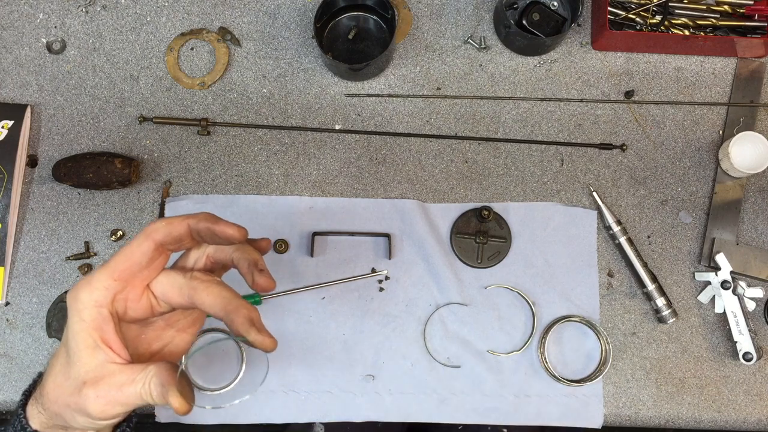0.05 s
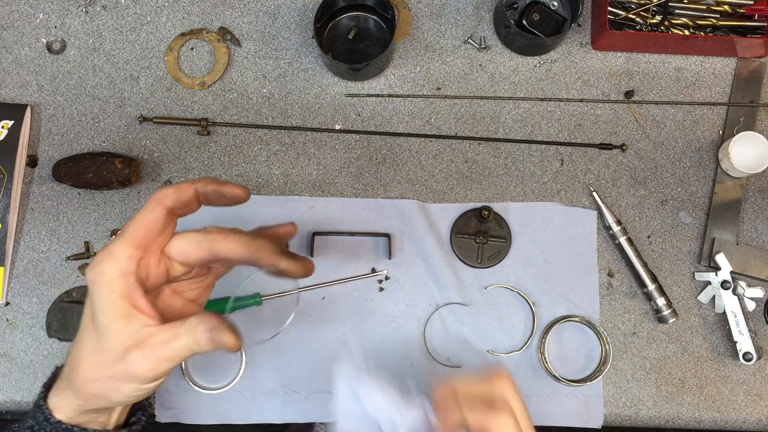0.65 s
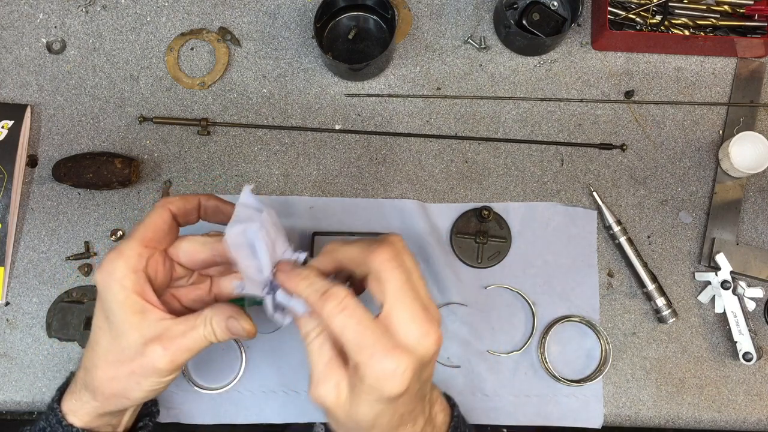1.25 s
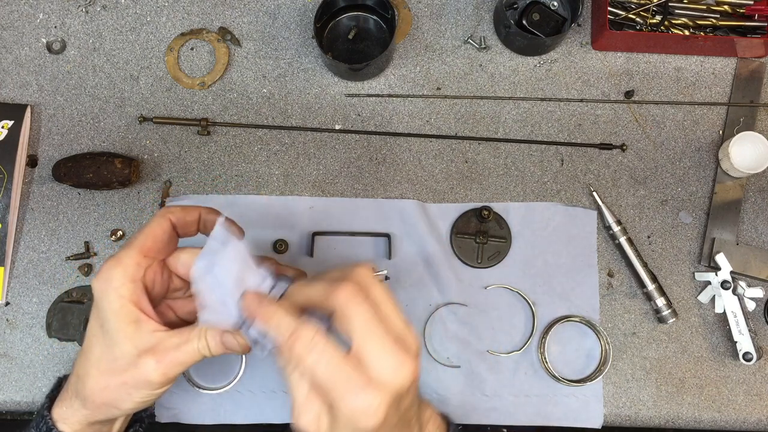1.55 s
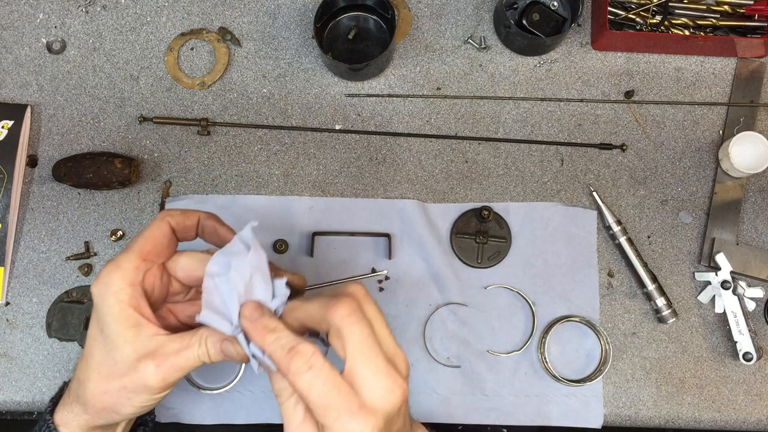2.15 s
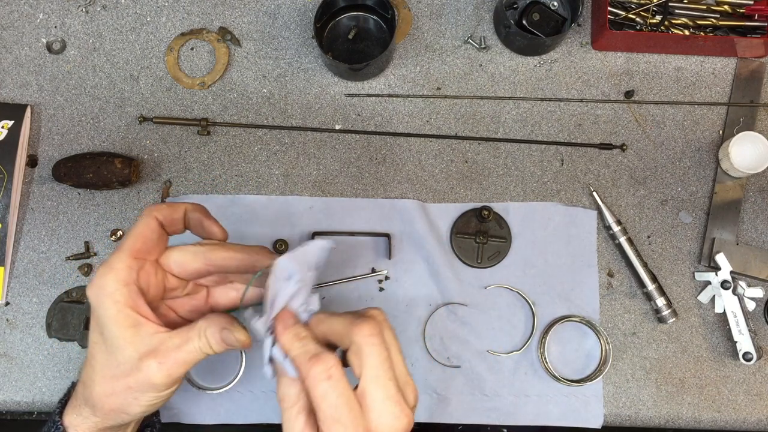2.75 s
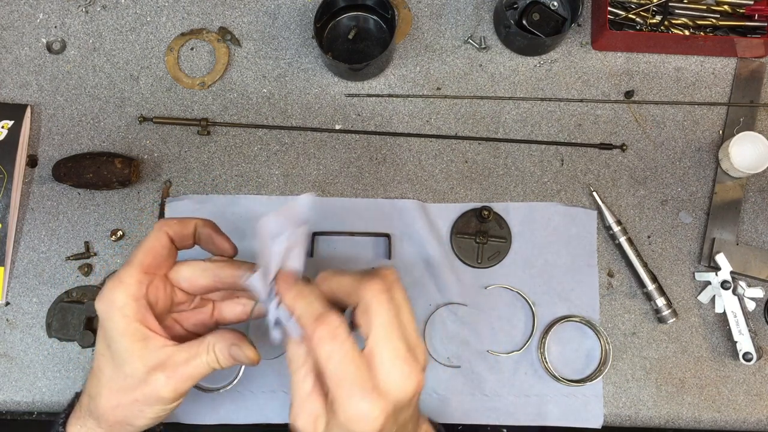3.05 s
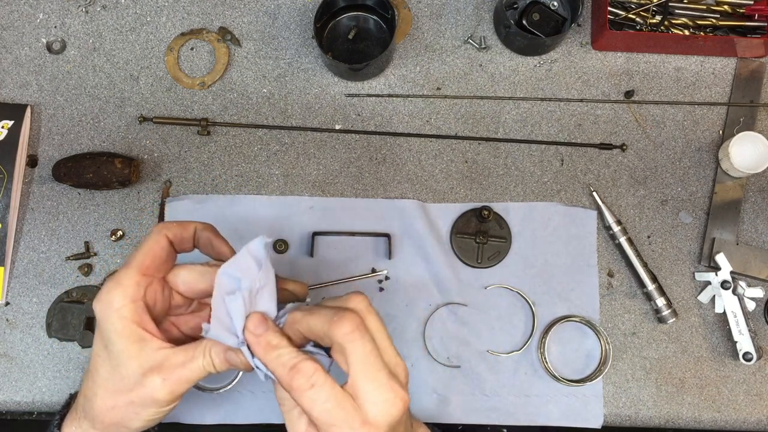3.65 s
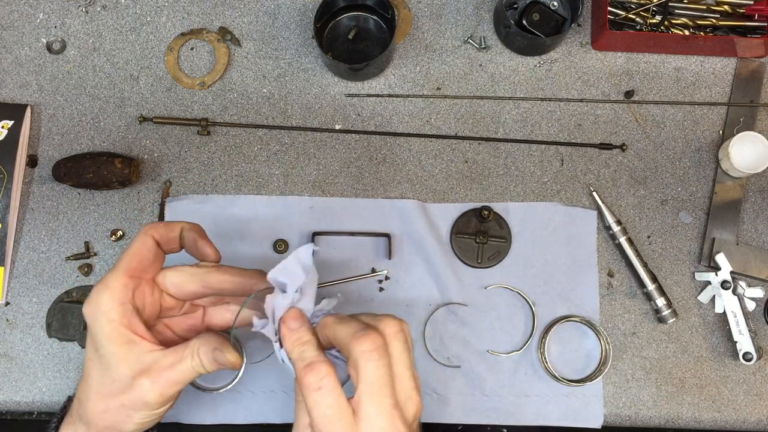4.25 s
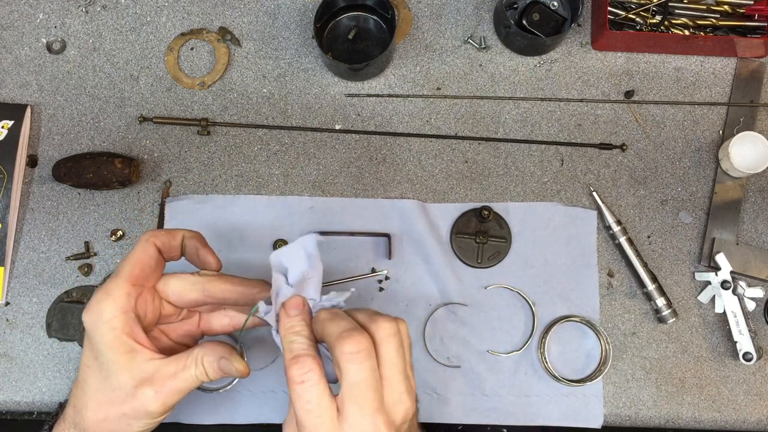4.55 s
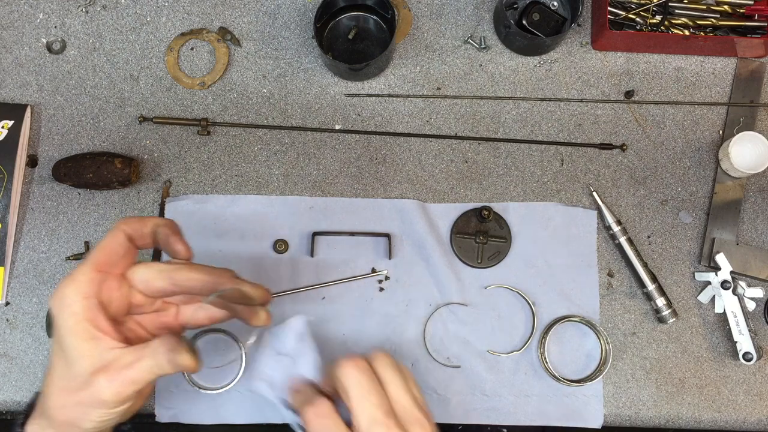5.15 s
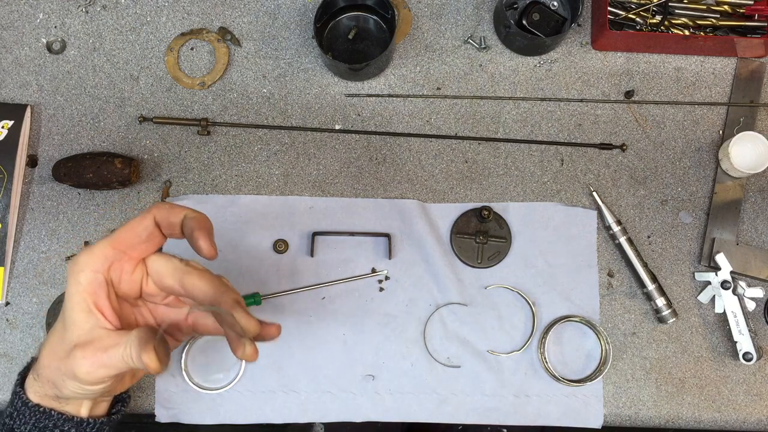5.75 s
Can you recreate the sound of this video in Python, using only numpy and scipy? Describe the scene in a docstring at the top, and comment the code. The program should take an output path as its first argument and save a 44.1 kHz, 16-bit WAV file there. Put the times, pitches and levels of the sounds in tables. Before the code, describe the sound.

In the first second a sleeve swishes over a workbench, with a couple of dry finger ticks and a few dull bumps around 0.2 seconds. From about 1 second a cloth polishes a small round glass in quick back-and-forth strokes, a soft hiss with some scraping. The glass sticks and slips in very short gliding squeaks that jump between a reedy low register and a thin high one. The squeaks come thickly until 2.5 seconds, ease off, and return from about 3.1 seconds. Near 4 seconds the glass judders once, briefly. Softer rubbing follows, with a few more squeaks around 4.8 to 5.1 seconds. By 5.4 seconds the strokes have ended and the cloth fades out in a dull rustle. Everything is close, with the slight echo of a small garage, still air and a faint electrical hum.

```python
"""A cloth polishes a small round glass held in the fingers, close up, over a workbench.
First the hand shifts, the sleeve swishes and the bench takes a few dead bumps. From 1 s quick strokes
hiss to and fro, and the glass sticks and slips in short gliding squeaks that jump between a low and a
high register. Near 4 s it judders once; by 5.4 s the strokes have ended and the cloth rustles out.
Throughout, a small garage answers faintly over still air and mains hum."""
import sys
import numpy as np
from scipy import signal
from scipy.fft import rfft, irfft, next_fast_len
from scipy.io import wavfile
from scipy.ndimage import uniform_filter1d, map_coordinates

SR = 44100
rng = np.random.default_rng(int(sys.argv[2]) if len(sys.argv) > 2 else 0)


def unload_audio(sound):
    """Save the sound as a 16-bit wav file, at the path given as the first command line argument."""
    columns = np.transpose(np.atleast_2d(sound))
    # keep every value between -1 and 1, then stretch to whole-number steps
    steps = np.round(np.clip(columns, -1, 1) * 32767)
    wavfile.write(sys.argv[1], SR, steps.astype(np.int16))


N = 255559
TIME = np.arange(N) / SR
BAND_LIMIT_HZ = 15850


def amp(db):
    """Decibels to gain."""
    return 10 ** (np.asarray(db) / 20)


def unit_rms(x):
    """Scales to rms 1."""
    return x / np.sqrt(np.mean(x ** 2) + 1e-20)


def at_hz(curve, hz):
    """Interpolates a table on a log-frequency axis."""
    points_hz, values = np.transpose(curve)
    return np.interp(np.log(hz + 1), np.log(points_hz + 1), values)


def colour(x, spectrum):
    """Filters x by a spectrum, at rms 1."""
    size = next_fast_len(len(x) + 512)
    gain = amp(at_hz(spectrum, np.fft.rfftfreq(size, 1 / SR)))
    return unit_rms(irfft(rfft(x, size) * gain, size)[:len(x)])


def wander(count, rate_hz):
    """Smooth random curve with a spread of about 1."""
    position = np.arange(count) * rate_hz / SR
    return map_coordinates(rng.standard_normal(int(position[-1]) + 4), [position + 1], order=2)


def add(mix, start_s, sound):
    """Mixes a sound in at a time."""
    part = mix[max(0, round(start_s * SR)):][:len(sound)]
    part += sound[:len(part)]


# Resonances that shape rasp and overtones. Each row: frequency in Hz, relative level in dB.
SLIP_SPECTRUM = [(40, -48), (250, -34), (480, -2), (800, 3.5), (1200, 2.5), (1700, 5.5), (2400, -3.5),
                 (3200, -11.5), (4200, -10.5), (5300, -12), (7000, -14), (10000, -29), (15000, -32)]

def stick_slip(length_s, mid_hz, glide_oct, level_db, swell_db, overtone_db, rasp_db, edge_s=0.0023):
    """The glass sticks and slips at a gliding rate; each slip also sheds a puff of noise."""
    count = int((length_s + edge_s / 2) * SR)
    progress = np.linspace(0, 1, count)
    roughness = amp(min(rasp_db, 0) / 2)
    arch_oct = 2.2 * length_s + 0.2 * abs(glide_oct)  # long or wide glides arch more
    first_hz = mid_hz * 2 ** (-glide_oct / 2 - arch_oct)
    last_hz = mid_hz * 2 ** (glide_oct / 2 - arch_oct)
    hz = np.polyval(np.polyfit([0, 0.5, 1], [first_hz, mid_hz, last_hz], 2), progress)
    cycles = np.cumsum(hz * (1 + 0.045 * roughness * wander(count, 700))) / SR
    tone = np.sin(2 * np.pi * cycles)
    for k, lag in enumerate(rng.random(size=8), 2):
        body_db = at_hz(SLIP_SPECTRUM, k * hz) - at_hz(SLIP_SPECTRUM, 2 * mid_hz) - 10 * np.log2(k / 2)
        smear = 0.097 * (k - 2 + roughness) * wander(count, 916)  # no two slips are alike
        overtone = np.sin(2 * np.pi * (k * cycles + lag + smear))
        tone += amp(overtone_db + body_db) * overtone * (k * hz < BAND_LIMIT_HZ)
    # Big slow slips rasp most; fast ones come unevenly strong and fray the tone.
    lowness = 1 / (1 + (mid_hz / 2200) ** 4)
    puffs = colour(rng.standard_normal(count) * np.exp(-(cycles % 1) / 0.2), SLIP_SPECTRUM)
    fray = 1 + 0.88 * roughness ** 2 * (1 - lowness) * wander(count, 1788)
    voice = np.sqrt(2) * tone * fray + amp(rasp_db - 0.5) * lowness * puffs
    grip = unit_rms(amp(swell_db * progress + 1.6 * roughness * wander(count, 341.93)))
    fades = signal.windows.tukey(count, min(1, 2 * edge_s / length_s))
    return amp(level_db) * voice * grip * fades


# Low-register slips. Each row: start in seconds, length in seconds, mid pitch in Hz, glide in octaves,
# then relative level, overtones and rasp in dB.
LOW_SLIPS = [(1.063, 0.026, 739, 1.04, -30.5, -30, -13.5), (1.194, .013, 1503, 0.38, -29.5, -35, -11),
             (1.302, .025, 1262, .8, -40.5, -18, -4.5), (1.349, 0.0065, 1236, -0.34, -33.5, -25, -23),
             (1.396, 0.016933, 670, 0.86, -32.5, -19, -19),
             (1.496, 0.007195, 960, 0.59, -30.5, -8.5, -10.5), (1.523, 0.025, 722, -0.17, -35, -18, -6),
             (1.602, 0.01737, 723.7, 0.13, -34, -17, -3.5), (1.698, 0.014523, 977.7, 0.71, -31, -9, -11.5),
             (1.817, 0.017575, 497, 0.353, -42, -6, -5), (1.908, 0.019, 874, 0.82, -34.5, -7, -15),
             (2.031, .021, 481, 0.46, -42, 1, -11), (2.114, 0.024, 879.6, 0.86, -33, -5.5, -10),
             (2.139, 0.034, 898, -0.14, -28, -9, -7.5), (2.252, .012, 731, 0.38, -40, 0, -1),
             (2.348, .01, 1112, 0.55, -30, -14, -13), (2.478, 0.012, 974, 0.47, -38.5, 2.5, 4.5),
             (3.11, 0.021, 736.4, 0.64, -42.5, -15, 0), (3.134, 0.024, 1200, -0.3119, -38.5, -33, -14),
             (3.207, .01, 740, 0.16, -39, -17, -16), (3.304, 0.019, 1124, 1.2135, -40, -12, -1),
             (3.342, 0.028176, 997.5, -0.3307, -36, -9.5, -8),
             (3.413, 0.019294, 753.8, 0.17, -38, -12, -26), (3.506, 0.037, 740, -.2, -33.5, -4.5, -9.5),
             (3.541, 0.035, 567, 0.37, -32.5, -4.5, -2), (3.572, .041, 907.5, 0.2142, -27, -13.5, -9),
             (3.752, .018, 742.7, -0.1788, -47.5, -9, -26), (3.807, 0.04784, 568.4, -0.61, -47, -11, -8),
             (3.92, 0.011, 1025, -0.36, -36.5, -12, -12), (3.93, 0.0282, 878, 0.22, -34.5, 0.5, -9.5),
             (4.028, 0.03797, 928.9, 0.078, -51, 8.5, -1), (4.067, 0.032, 1472, 0.11, -37, -16.5, -18),
             (4.107, 0.021826, 1530, -0.1956, -37, -20, -22.5),
             (4.127, 0.02643, 1055, -0.2051, -45, 0.5, -8), (4.813, 0.0345, 681, 0.16, -35, -6.5, -14.5),
             (5.018, 0.017, 1953, 0.11, -41.5, -13, -4.5)]

def low_squeaks():
    """The glass breaks loose, reedy; slower slips are bigger, and a rising squeak builds gradually."""
    out = np.zeros(N)
    for start_s, length_s, hz, glide_oct, db, overtone_db, rasp_db in LOW_SLIPS:
        edge_s = 0.002 + 0.18 * max(glide_oct, 0) * length_s
        swell_db = 1 - 6 * glide_oct
        add(out, start_s, stick_slip(length_s, hz, glide_oct, db, swell_db, overtone_db, rasp_db, edge_s))
    return out


# High-register slips. Each row: start in seconds, length in seconds, mid pitch in Hz, glide in octaves,
# then relative level and rasp in dB.
HIGH_SLIPS = [(1.079, 0.012912, 2177, 0.62, -36, 2.5), (1.089, 0.035, 2911, -0.01, -33, -10.5),
              (1.122, 0.034, 2435, 0.06, -37, -2.5), (1.309, 0.021, 4950, 0.6, -43.5, -8),
              (1.497, 0.016, 4240, .02, -48, 0), (1.6, .006, 2430, 0.04, -38.5, -2),
              (1.606, 0.0081, 4800, 0.1, -43.5, -11), (1.727, 0.02266, 5480, -0, -49.5, -7),
              (1.741, 0.01601, 2417, -0.08, -42, 3), (1.811, 0.008137, 2036, 0.47, -33, 0),
              (1.814, 0.021, 4110, 0.39, -40, -5.5), (1.945, 0.017, 5340, -0.1, -43, -41),
              (2.021, 0.02246, 2559, 0.75, -36.5, -1), (2.165, 0.03001, 2400, 0.26, -36, -36),
              (2.254, .02, 2248, 0.7, -36.5, -7), (2.357, 0.0379, 2530, -0.11, -35.5, -17),
              (2.484, 0.00874, 4035, .15, -34, -6), (2.489, 0.011, 2820, .2, -36, -6),
              (3.122, 0.0136, 4010, 0.26, -49, -3), (3.323, .024, 4700, .45, -51, 0),
              (3.412, 0.01338, 4982, 0.35, -37, -16), (3.51, .036, 4950, 0.5, -42.5, -1.5),
              (3.548, 0.0603, 5170, .08, -43.5, -1.5), (3.835, 0.0099, 4020, -.1, -50.5, -2.5),
              (4.846, 0.016, 3073, .06, -35.5, -24.5), (4.862, 0.039, 3336, -0.24, -35.5, -11.5),
              (5.042, .016, 5279, .05, -38.5, -29), (5.052, 0.057, 4520, -0.34, -45.5, -17)]

def whistles(swell_db_per_oct=-16):
    """In mid-stroke the slipping jumps high; it fades as it rises and swells as it falls."""
    out = np.zeros(N)
    for start_s, length_s, hz, glide_oct, db, rasp_db in HIGH_SLIPS:
        overtone_db = -8 + at_hz(SLIP_SPECTRUM, 2 * hz) - at_hz(SLIP_SPECTRUM, hz)
        swell_db = swell_db_per_oct * glide_oct
        add(out, start_s, stick_slip(length_s, hz, glide_oct, db, swell_db, overtone_db, rasp_db))
    return out


# The cloth sticking again. Each row: start in seconds, relative level in dB.
CLOTH_GRABS = [(1.148, -45.5), (1.748, -32), (1.962, -28.5), (2.188, -31.5), (2.389, -34), (2.967, -41),
               (3.037, -40.5), (3.151, -34.5), (3.365, -39), (3.608, -33), (4.892, -31.5)]

def grabs():
    """A few slowing slips end a stroke in a short falling croak."""
    out = np.zeros(N)
    for start_s, db in CLOTH_GRABS:
        croak = stick_slip(length_s=0.00624, mid_hz=742.7, glide_oct=-0.35, level_db=db,
                           swell_db=-12, overtone_db=-1, rasp_db=-2.5)
        add(out, start_s, croak)
    return out


# Modes of the held glass. Each row: frequency in Hz, bandwidth in Hz, relative level in dB.
GLASS_MODES = [(830.1, 110, -5), (1576, 171.5, 3.5), (2140, 190, -8.5), (5300, 380, -8.5)]

def judder(start_s=3.9575, slips=9, first_gap_s=0.0042, slowing=1.178, first_db=-17, step_db=-1.57):
    """Lone slips, ever later and weaker, each ring the finger-damped glass for a few cycles."""
    out, t = np.zeros(N), np.arange(SR // 40) / SR
    attack = 1 - np.exp(-t / 0.0014)
    for k in range(slips):
        ring = np.zeros(len(t))
        for hz, width_hz, db in GLASS_MODES:
            detuned_hz = hz * rng.uniform(0.94, 1.05)
            ring += amp(db) * np.exp(-np.pi * width_hz * t) * np.sin(2 * np.pi * detuned_hz * t)
        add(out, start_s, amp(first_db + k * step_db) * ring * attack)
        start_s += first_gap_s * slowing ** k
    return out


def movement(rows, sharpness):
    """Speed envelope: each move starts from rest, peaks at 42 % of its length and stops again."""
    out = np.zeros(N)
    for start_s, length_s, db in rows:
        t = np.arange(max(0, -start_s), length_s, 1 / SR)
        angle = np.interp(t / length_s, [0, 0.42, 1], [0, np.pi / 2, np.pi])
        add(out, start_s, amp(db) * abs(np.sin(angle)) ** sharpness)
    return out


def fibres(spectrum, grain_db, flutter_db):
    """Countless tiny snags of uneven size, coming in clumps."""
    sizes = np.minimum(rng.exponential(1, N), 3.5)
    snags = rng.standard_normal(N) * amp(grain_db * sizes)
    clumps = amp(flutter_db * wander(N, 260))
    return colour(snags * clumps, spectrum)


# Polishing strokes. Each row: start in seconds, length in seconds, relative level in dB.
CLOTH_STROKES = [(1.044, 0.15, -52), (1.17, 0.12, -53), (1.286, 0.094, -54), (1.375, 0.12, -57.5),
                 (1.477, 0.091, -51), (1.578, 0.11, -57.5), (1.687, 0.097, -49.5), (1.786, 0.10426, -55),
                 (1.897, .105, -51), (1.998, 0.10745, -54), (2.107, .12, -51.5), (2.207, 0.14765, -59),
                 (2.332, 0.11, -58), (2.452, .114, -53), (2.57, 0.18253, -52.5), (2.752, 0.14368, -51.5),
                 (2.911, 0.094, -53), (2.992, 0.08653, -62.5), (3.067, 0.12, -54), (3.188, 0.11, -59),
                 (3.287, 0.11766, -56), (3.387, .1, -58), (3.48, 0.1717, -53.5), (3.685, 0.0625, -70.5),
                 (3.731, 0.10882, -53), (3.919, .1, -53), (4.005, .18, -52.5), (4.16, 0.12, -57),
                 (4.25, 0.087, -58), (4.335, 0.12, -57), (4.45, 0.08204, -70.5), (4.513, 0.056, -61.5),
                 (4.582, 0.068, -54), (4.62, 0.1452, -65), (4.79, 0.13, -53), (4.975, 0.21061, -53.5),
                 (5.151, 0.035, -49), (5.24, 0.084, -61)]
# Finger pressure. Each row: time in seconds, scrape gain in dB.
FINGER_PRESSURE = [(1.1, 4), (1.3, 7.5), (1.6, 6.5), (2.05, 8), (2.28, 14.5), (2.5, 9.5), (2.8, -7.5),
                   (3.05, 8.5), (3.4, 1.5), (3.55, 5), (3.96, 4), (4.09, -13), (4.3, 3), (4.85, -3),
                   (5.17, 1.5), (5.27, 10)]
# Cloth on glass. Each row: frequency in Hz, relative level in dB.
HISS_SPECTRUM = [(1500, -8.5), (3000, -1.5), (4500, -7), (6000, -0.5), (7400, 4.5), (9800, -6), (12500, -1),
                 (15800, -10.5)]
SCRAPE_SPECTRUM = [(150, -43), (350, -6), (700, -0.5), (1100, -1), (1700, 1), (2400, -4.5), (3300, -15.5),
                   (6000, -16), (12000, -50)]

def cloth(creep_db=-21, creep_s=0.18):
    """Hiss and scrape follow the speed of each stroke; at the turns the folds only creep."""
    speed = movement(CLOTH_STROKES, sharpness=1.66)
    creep = amp(creep_db) * uniform_filter1d(speed, int(creep_s * SR))
    pressure_db = np.interp(TIME, *np.transpose(FINGER_PRESSURE))
    hiss = amp(2.5) * fibres(HISS_SPECTRUM, grain_db=2.5, flutter_db=2.5)
    scrape = amp(pressure_db - 0.85) * fibres(SCRAPE_SPECTRUM, grain_db=2.5, flutter_db=3)
    return (speed + creep) * (hiss + scrape)


# Sleeve moves. Each row: start in seconds, length in seconds, relative slide and fizz levels in dB.
SLEEVE_MOVES = [(-.12, 0.38, -43.5, -55), (0.048, 0.07776, -47, -48), (0.201, 0.1, -41, -43),
                (0.264, 0.16, -42, -47.5), (0.419, 0.081, -48, -62), (0.474, 0.14, -41, -40.5),
                (0.543, 0.24, -52.5, -59), (0.686, 0.027, -53, -59.5), (0.713, 0.26, -49, -47),
                (0.93, 0.2, -57, -53.5)]
# Sleeve on bench. Each row: frequency in Hz, relative level in dB.
SLIDE_SPECTRUM = [(25, -20), (60, -5), (200, -8), (500, -8.5), (900, -0.5), (1800, 7), (2800, -2.5),
                  (5000, -7.5), (8000, -14), (15000, -20)]
FIZZ_SPECTRUM = [(1500, -8), (3000, -2.5), (4500, -4.5), (7200, 1.5), (9800, -4), (12500, -5.5),
                 (15800, -17.5)]

def sleeve(sharpness=1.16):
    """Hand and sleeve slide over the bench: a swish with a fine fizz on top."""
    start_s, length_s, slide_db, fizz_db = np.transpose(SLEEVE_MOVES)
    slide_speed = movement(zip(start_s, length_s, slide_db + 0.2), sharpness)
    fizz_speed = movement(zip(start_s, length_s, fizz_db - 6.5), sharpness)
    slide = slide_speed * fibres(SLIDE_SPECTRUM, grain_db=4, flutter_db=2)
    fizz = fizz_speed * fibres(FIZZ_SPECTRUM, grain_db=4.5, flutter_db=3)
    return slide + fizz


# Handling of the cloth. Each row: time in seconds, relative level in dB.
RUSTLE_LEVELS = [(0, -47), (.26, -49.5), (1.08, -57), (1.2, -61), (1.7, -66.5), (2.05, -72.5), (2.29, -49),
                 (2.8, -64), (3.15, -61), (3.75, -69), (4.75, -68.5), (5.2, -59.5), (5.38, -53.5),
                 (5.79, -76)]
# New grips. Each row: start in seconds, length in seconds, relative level in dB.
GRIP_SQUEEZES = [(.19, 0.04412, -49), (1.055, 0.06565, -51), (2.135, 0.067, -49), (3.81, 0.13, -55),
                 (5.152, 0.046, -53.5)]
# Bunched cloth. Each row: frequency in Hz, relative level in dB.
RUSTLE_SPECTRUM = [(30, -14.5), (70, -9), (150, -2.5), (280, -1), (450, -2), (900, -7), (2500, -25.5)]

def rustle():
    """The bunched cloth rustles dully throughout, more when squeezed for a new grip."""
    handling = amp(np.interp(TIME, *np.transpose(RUSTLE_LEVELS)))
    squeezes = movement(GRIP_SQUEEZES, sharpness=1.16)
    return amp(-2.5) * (handling + squeezes) * fibres(RUSTLE_SPECTRUM, grain_db=1.5947, flutter_db=1.1)


# Finger and fold ticks. Each row: start in seconds, relative level in dB, low-pass cutoff in Hz.
FINGER_TICKS = [(0.0636, -35, 13000), (0.196, -27, 4660), (2.172, -29, 8000), (2.305, -49, 6000),
                (2.3153, -54, 6000), (4.595, -51, 15000), (5.1618, -45, 15000)]
# Colour of a tick. Each row: frequency in Hz, relative level in dB.
TICK_SPECTRUM = [(40, -40), (200, -2), (600, -4), (1600, 7), (2700, -10), (4200, 5), (6500, -26),
                 (15000, -23.5)]

def ticks(decay_s=0.00085):
    """Fingers and cloth folds give off tiny dry bursts of noise."""
    out, t = np.zeros(N), np.arange(SR // 5) / SR
    for start_s, db, cutoff_hz in FINGER_TICKS:
        burst = amp(db + 2) * colour(rng.standard_normal(len(t)), TICK_SPECTRUM) * np.exp(-t / decay_s)
        lowpass = signal.butter(2, cutoff_hz, fs=SR, output="sos")
        add(out, start_s, signal.sosfilt(lowpass, burst))
    return out


# Hand on bench. Each row: start in seconds, level in dB, pitch in Hz, T60 in seconds.
BENCH_BUMPS = [(0.197, -22.5, 233, 0.02152), (0.202, -28, 93.83, 0.094), (0.247, -34.5, 105, 0.13),
               (2.167, -39, 246, 0.04768)]

def bumps(attack_s=0.0012):
    """The hand knocks the bench: dead thuds, one damped mode each."""
    out, t = np.zeros(N), np.arange(SR // 5) / SR
    attack = 1 - np.exp(-t / attack_s)
    for start_s, db, hz, t60_s in BENCH_BUMPS:
        add(out, start_s, amp(db - 60 * t / t60_s) * np.sin(2 * np.pi * hz * t) * attack)
    return out


# Garage decay. Each row: frequency in Hz, T60 in seconds.
GARAGE_T60 = [(150, .35), (800, 0.22), (2700, 0.2734), (5500, 0.3), (14000, 0.27)]
# Colour of the reflections. Each row: frequency in Hz, gain in dB.
ECHO_SPECTRUM = [(300, -3.5), (800, -1), (1500, 0.5), (2800, 6.5), (5000, 2.5), (9000, -3), (15000, -10)]

def garage(direct):
    """Adds near echoes from the bench and its tools, then a faint tail that dies by band."""
    count = SR // 2
    t = np.arange(count) / SR
    hz, frame_s, bands = signal.stft(rng.standard_normal(count) * (t > 0.006), SR, nperseg=256)
    decay = amp(-60 * frame_s / at_hz(GARAGE_T60, hz)[:, None])
    tail = signal.istft(bands * decay, SR, nperseg=256)[1][:count]
    early = np.zeros(count)
    signs = rng.choice([-1, 1], size=12)
    delays_s = rng.uniform(0.001, 0.012, size=12)
    early[(delays_s * SR).astype(int)] = signs
    echoes = amp(-13) * early / np.linalg.norm(early) + amp(-17) * tail / np.linalg.norm(tail)
    gain = amp(at_hz(ECHO_SPECTRUM, np.fft.rfftfreq(count, 1 / SR)))
    response = irfft(rfft(echoes) * gain, count)[:count - SR // 20]
    return direct + signal.fftconvolve(direct, response)[:N]


# Room air. Each row: frequency in Hz, relative level in dB.
AIR_SPECTRUM = [(25, 0), (60, 3), (130, 4), (400, 0), (1400, 2), (3000, -10.5), (7000, -12.5),
                (15000, -20.5)]

def background(air_db=-65, hum_hz=100.4, hum_db=-72.5):
    """Still air and a faint, wavering mains hum."""
    phase = 2 * np.pi * hum_hz * TIME + 0.21 * wander(N, 9.1)
    hum = np.sqrt(2) * np.sin(phase) * amp(0.353 * wander(N, 9.7))
    air = colour(rng.standard_normal(N), AIR_SPECTRUM)
    return amp(air_db) * air + amp(hum_db) * hum


def scene():
    """Everything at the bench, heard in the garage; mono."""
    glass = amp(-0.2) * (low_squeaks() + whistles() + grabs()) + judder()
    bench = glass + cloth() + sleeve() + rustle() + ticks() + bumps()
    return (garage(bench) + background())[None]


def record(dry, low_cut_hz=45):
    """The microphone sheds the deepest bass; the recorder limits the treble."""
    highpass = signal.butter(2, low_cut_hz, "highpass", fs=SR, output="sos")
    lowpass = signal.firwin(701, BAND_LIMIT_HZ, window=("kaiser", 9), fs=SR)
    return signal.oaconvolve(signal.sosfilt(highpass, dry), lowpass[None], "same")


dry = scene()
out = record(dry)
unload_audio(out)
```